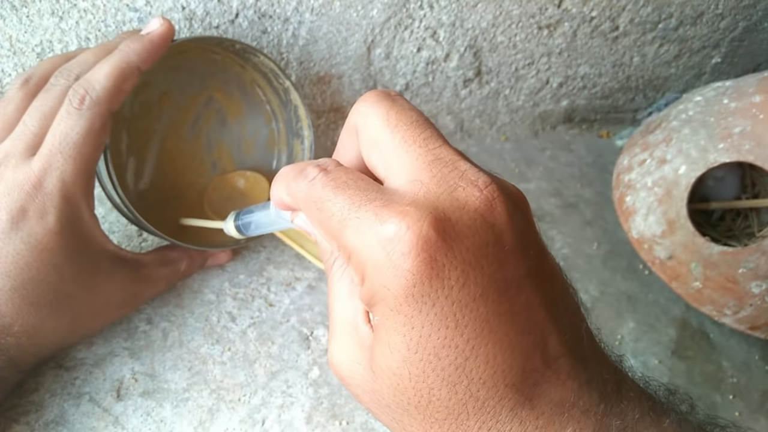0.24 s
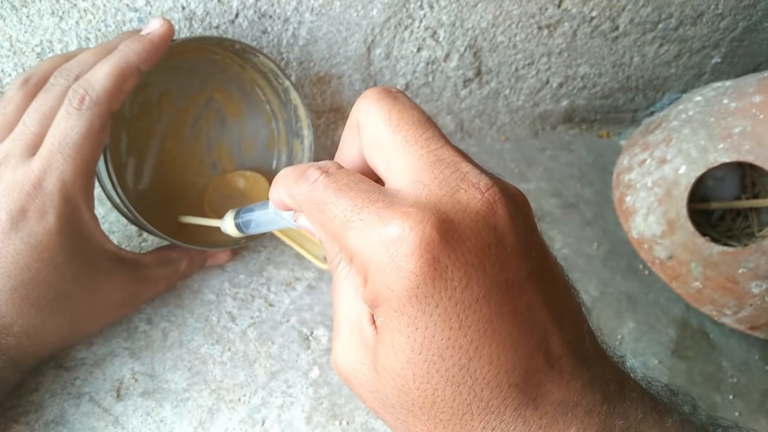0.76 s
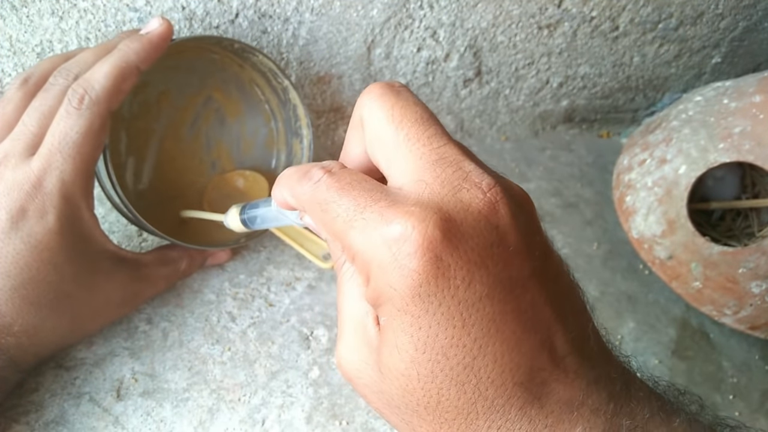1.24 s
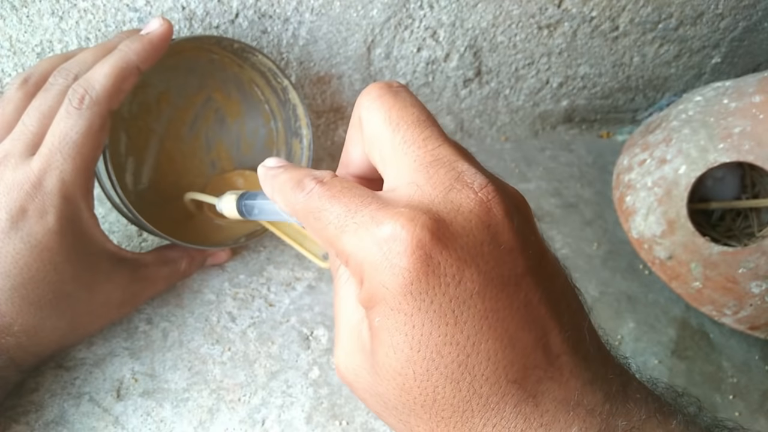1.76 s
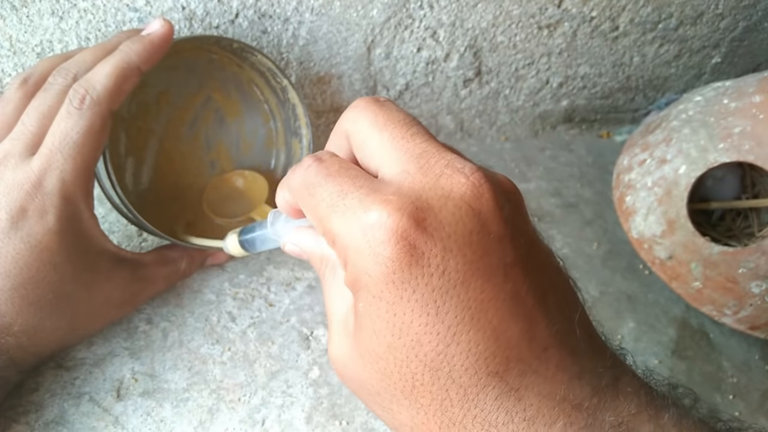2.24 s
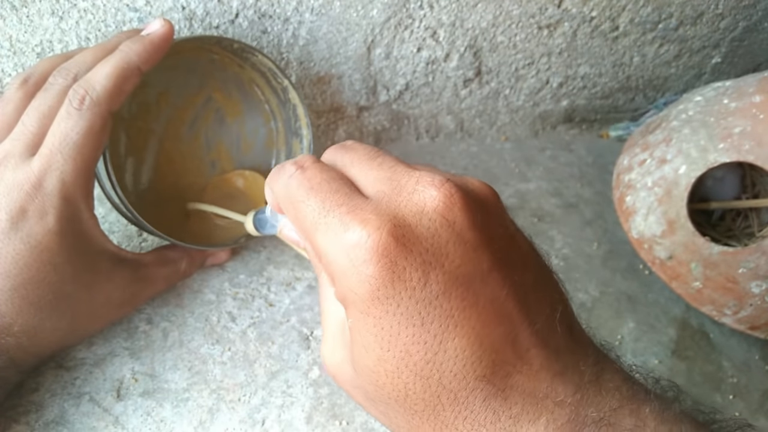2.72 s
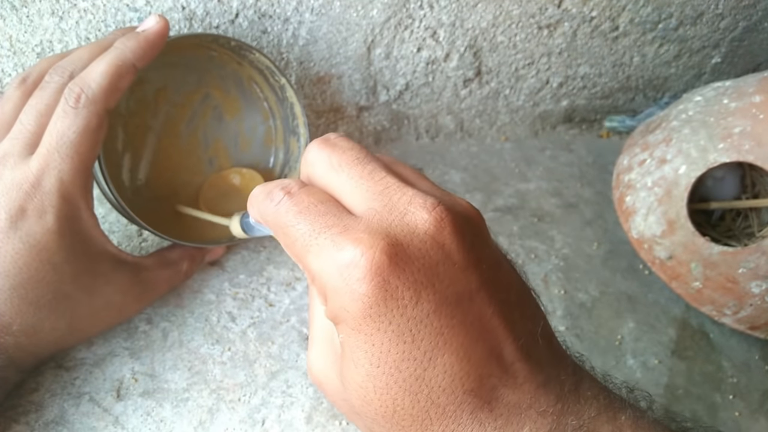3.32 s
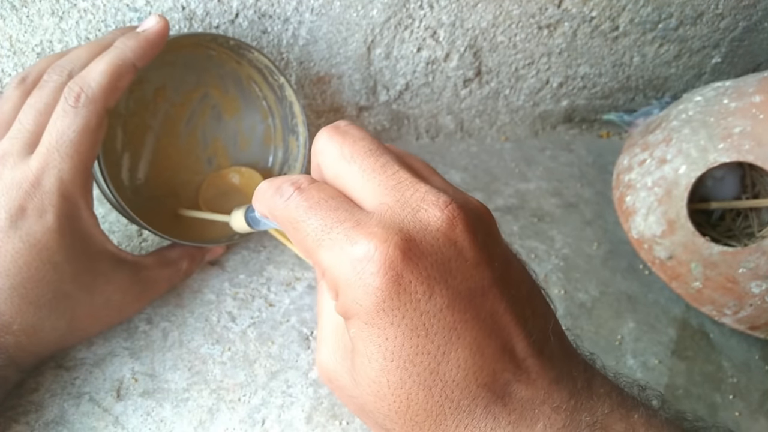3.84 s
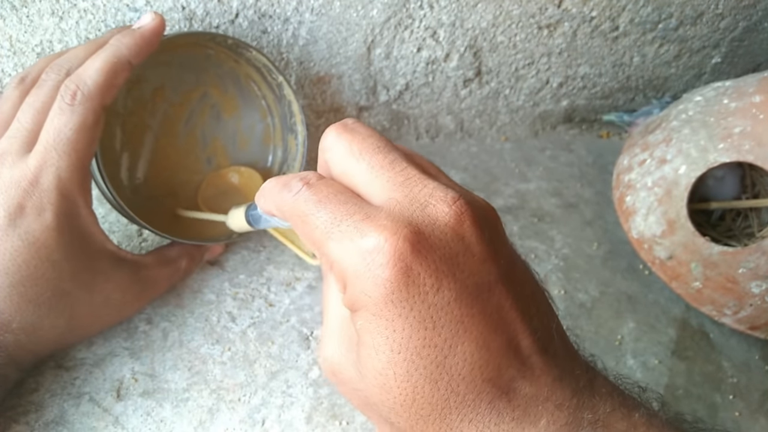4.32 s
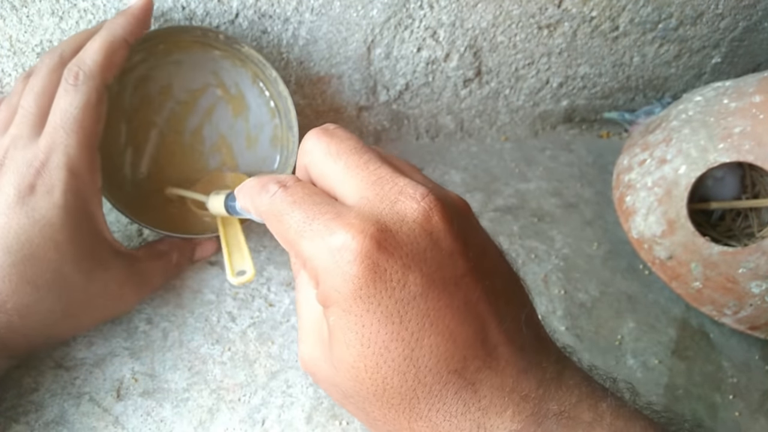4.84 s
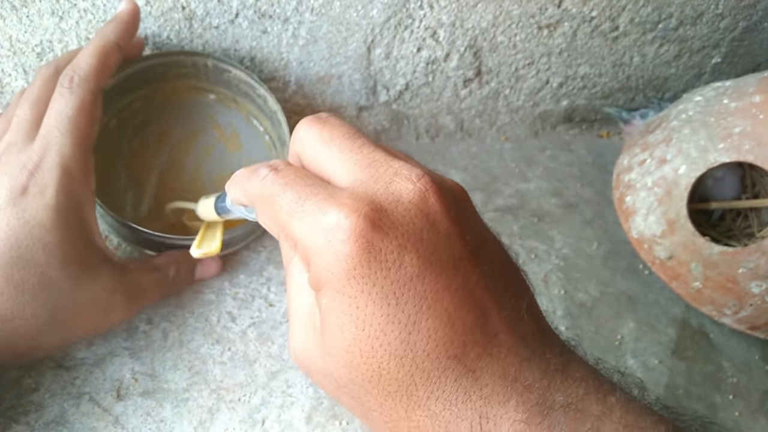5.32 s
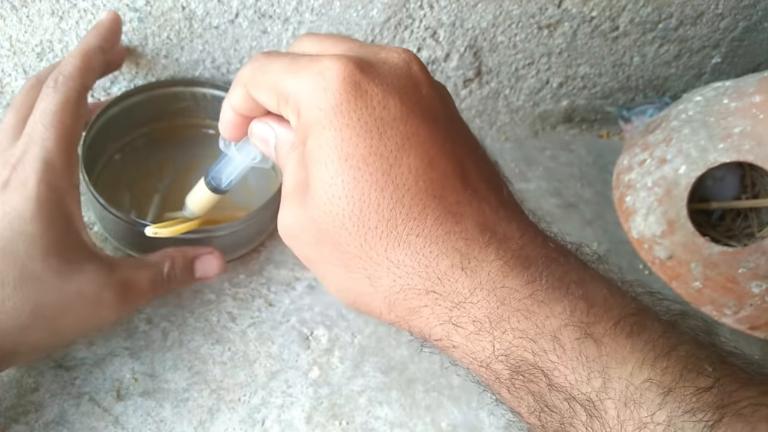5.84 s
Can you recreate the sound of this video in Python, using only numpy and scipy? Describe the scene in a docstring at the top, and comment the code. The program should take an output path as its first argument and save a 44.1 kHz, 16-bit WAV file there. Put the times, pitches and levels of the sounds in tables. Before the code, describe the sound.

In a quiet concrete room, nestlings keep up soft, high, raspy cheeping that comes in waves. A sharp plastic click from a syringe sounds close by, followed by a barely audible low call from a far bird. Later a nearby steel cup is tipped, scraping and rattling with spoon knocks and more syringe clicks. The spoon clinks against the steel, the ring is cut short and the cheeping thins out.

```python
"""Hungry nestlings beg from a clay nest pot in a bare concrete room: thin, hoarse cheeps over bouts
of chatter, with a few pure peeps. Close by, a plastic syringe for their feed clicks, loudest at 1.6 s.
From 2.2 s a far bird holds one faint, low call. From 4.5 s the steel feed cup is tipped: its foot
grates on the floor, a spoon knocks in it and the syringe clicks again. The spoon clinks on bare steel
at 5.5 s, fingers choke the ring, and the begging thins out."""
import sys
import numpy as np
from scipy import signal
from scipy.fft import rfft, irfft, next_fast_len
from scipy.io import wavfile
from scipy.ndimage import uniform_filter1d

SR = 44100
rng = np.random.default_rng(int(sys.argv[2]) if len(sys.argv) > 2 else 0)


def store_wav(level_fs):
    """Save 16-bit WAV to argv[1]."""
    pcm = np.round(np.clip(np.atleast_2d(level_fs), -1, 1) * 32767)
    wavfile.write(sys.argv[1], SR, pcm.T.astype(np.int16))


N = 267995
TIME = np.arange(N) / SR
ROOM_T60_S, CUP_MOVES_S = 0.28, 4.5


def from_db(db):
    return 10 ** (np.asarray(db) / 20)


def rms_one(x):
    return x / np.sqrt(np.mean(x ** 2) + 1e-20)


def in_time(rows):
    """The columns of a curve, at every sample."""
    times_s, *columns = np.transpose(rows)
    return [np.interp(TIME, times_s, column) for column in columns]


def at_hz(points, hz):
    """A spectrum read on a log-frequency axis."""
    known_hz, values = np.transpose(points)
    return np.interp(np.log(hz + 1), np.log(known_hz), values)


def decay(start_s, t60_s):
    """Gain of 1 until start_s, then an exponential fall."""
    return from_db(-60 * np.maximum(TIME - start_s, 0) / t60_s)


def swell(start_s, end_s, rise_s, t60_s):
    """Envelope: rise around start_s, hold until end_s, decay."""
    return (1 + np.tanh((TIME - start_s) / rise_s)) / 2 * decay(end_s, t60_s)


def drift(rate_hz, size=N):
    """Smooth random motion of rms 1."""
    pole = np.exp(-2 * np.pi * rate_hz / SR)
    white = rng.standard_normal(size + SR // 10)
    return rms_one(signal.lfilter([1], [1, -2 * pole, pole * pole], white)[-size:])


# left-right likeness: (frequency [Hz], correlation [0-1])
STEREO_LIKENESS = [(2500, 1), (4500, 1), (6500, 0.99), (9000, 0.72), (14000, 0.9)]


def noise(spectrum):
    """Coloured stereo noise of rms 1, wider in the treble."""
    size = next_fast_len(N)
    hz = np.fft.rfftfreq(size, 1 / SR)
    mid, side = rfft(rng.standard_normal((2, size))) * from_db(at_hz(spectrum, hz))
    alike = np.clip(at_hz(STEREO_LIKENESS, hz), 0, 1)
    stereo = np.sqrt(1 + alike) * mid + np.sqrt(1 - alike) * np.array([side, -side])
    return rms_one(irfft(stereo, size)[:, :N])


def patchy_noise(spectrum, depth_db, window):
    """Noise of rms 1 whose narrow bands swell and fade on their own."""
    bands = signal.stft(noise(spectrum), nperseg=window)[2]
    patches = uniform_filter1d(rng.standard_normal(bands.shape[1:]), size=3, axis=0)
    patches = rms_one(uniform_filter1d(patches, size=4, axis=1))
    return rms_one(signal.istft(bands * from_db(depth_db * patches), nperseg=window)[1][:, :N])


def room(x, wet_db):
    """Direct sound plus a dense, dying wash of wall reflections."""
    envelope = decay(0, ROOM_T60_S) * (TIME > .004)
    tail = (noise([(100, 0), (14000, 0.019)]) * envelope)[:, :SR]
    tail /= np.sqrt(np.sum(tail ** 2) / 2)
    return x + from_db(wet_db) * signal.fftconvolve(tail, x[None], axes=1)[:, :N]


# still room: (frequency [Hz], relative density [dB])
AIR_SPECTRUM = [(25, -13), (45, -2.5), (62, 3.5), (90, -8.5), (130, -9.5), (200, -17), (300, -11),
                (420, -16), (1000, -13.5), (2500, -18.5), (5000, -34), (14000, -40)]


def room_air(level_db=-68):
    """The faint, low hush of the room."""
    return from_db(level_db + drift(12)) * patchy_noise(AIR_SPECTRUM, depth_db=5, window=2048)


# the brood's merged voices: (frequency [Hz], relative density [dB])
CHATTER_SPECTRUM = [(600, -32.5), (1000, -31.5), (1400, -11.5), (1900, 1), (2250, -1), (3000, 4.5),
                    (4000, 3), (4700, -5.5), (6000, -19.5)]
WHEEZE_SPECTRUM = [(3500, -19), (5000, -3.5), (7000, -2), (8800, 2.5), (9900, 0.5), (11000, -13),
                   (14000, -25)]
# begging bouts: (start [s], end [s], relative chatter level [dB], relative wheeze level [dB])
BEGGING_BOUTS = [(0, 0.015, -57, -66), (0.131, .37, -60.5, -72), (0.444, 1.216, -52.5, -61.5),
                 (1.271, 1.751, -56, -57.5), (1.88, 2.327, -52, -60.5), (2.448, 2.63, -59.5, -63.5),
                 (2.922, 3.491, -55, -57.5), (3.539, 4.164, -48, -59.5), (4.169, 4.418, -56.5, -57),
                 (4.551, 5.126, -55, -61), (5.121, 5.364, -62, -60), (5.58, 5.736, -54, -63.5),
                 (5.897, 5.983, -70.5, -64)]


def brood(chatter_gain_db=-9, wheeze_gain_db=-4.5, rise_s=.03, surge_db=2.5):
    """Overlapping calls, blurred by the room, merge into a hoarse chatter with a wheeze on top."""
    chatter_level, wheeze_level = np.zeros((2, N))
    for start_s, end_s, chatter_db, wheeze_db in BEGGING_BOUTS:
        chatter_bout = from_db(chatter_db + chatter_gain_db) * swell(start_s, end_s, rise_s, t60_s=.22)
        wheeze_bout = from_db(wheeze_db + wheeze_gain_db) * swell(start_s, end_s, rise_s, t60_s=.15)
        chatter_level = np.maximum(chatter_level, chatter_bout)
        wheeze_level = np.maximum(wheeze_level, wheeze_bout)
    chatter = chatter_level * patchy_noise(CHATTER_SPECTRUM, depth_db=5.5, window=1280)
    wheeze = wheeze_level * patchy_noise(WHEEZE_SPECTRUM, depth_db=5.5, window=768)
    return (chatter + wheeze) * from_db(surge_db * drift(10))


def weak_cheeps(per_s=5, re_chatter_db=-11.5, length_s=.13, low_hz=2595, high_hz=4200):
    """Rows like CLEAR_CHEEPS, scattered over the bouts at random pitches."""
    rows = []
    for start_s, end_s, chatter_db, _ in BEGGING_BOUTS:
        for slot, (offset, height, hoarse) in enumerate(rng.random(size=(8, 3))):
            middle_s = start_s + (slot + offset) / per_s
            hz = low_hz * (high_hz / low_hz) ** height
            if middle_s < end_s:
                rows.append((middle_s, length_s, hz, chatter_db + re_chatter_db, hoarse / 2))
    return rows


# breathy hiss of the cheeps, brightest near 9 kHz: (frequency [Hz], relative density [dB])
CHEEP_HISS_SPECTRUM = [(4500, -44), (6000, -17), (7300, -3), (8300, 5.5), (9200, 7.5), (10000, -5.5),
                       (11000, -10.5), (14000, -16)]
# clearest cheeps: (time [s], length [s], pitch [Hz], relative level [dB], hoarseness [0 pure, 1 full])
CLEAR_CHEEPS = [(0.138, 0.078, 5780, -66, .1), (0.186, .1, 3270, -62.5, 0.78),
                (0.33, .12, 3896, -55.5, 0.64), (.5, 0.075, 4760, -54, 0.75), (.584, .1, 1474, -62.5, 0),
                (0.661, 0.13, 3710, -60.5, 1.2), (0.762, 0.073, 6460, -56, 0.72),
                (0.843, 0.15, 2853, -59, 0.19), (1.103, 0.084, 5710, -61.5, 0),
                (1.13, 0.15, 3680, -60, 0.71), (1.363, 0.15, 3986, -59.5, 0.83),
                (1.447, .1, 5500, -54, 0.27), (1.561, 0.092, 3960, -57, 0.87), (1.83, .12, 3315, -58, 0.01),
                (1.939, 0.13, 3890, -62, 0.85), (2.216, 0.19, 3630, -54.5, .75),
                (2.576, 0.11, 3980, -64, 0.98), (2.875, 0.13, 3115, -58.5, 0.17),
                (2.955, 0.068, 6900, -62.5, 0.57), (3.088, 0.11, 3060, -56.5, 0.49),
                (3.105, .13, 5600, -60, 0.61), (3.177, .11, 3350, -52, 0), (3.313, 0.11, 5090, -57, 0.24),
                (3.617, 0.073, 5340, -58, 0.64), (3.625, .25, 1867, -65, 0),
                (3.649, 0.24, 3080, -52.5, 0.3), (3.793, 0.096, 4080, -48.5, 0.7),
                (3.823, .09, 6380, -57.5, 0.36), (3.869, 0.14, 3120, -48.5, 0.26),
                (3.987, 0.095, 4060, -55, .7), (3.994, .16, 1823, -64.5, 0), (4.071, 0.15, 3087, -55.5, .6),
                (4.11, 0.17, 6270, -56.5, 0.85), (4.556, 0.074, 4700, -62.5, 0.95),
                (4.618, .057, 5380, -52, 0.64), (4.736, 0.072, 4100, -57, 0.16),
                (4.753, 0.068, 6310, -50.5, 0.74), (4.925, 0.091, 4360, -52.5, 0.61),
                (5.012, 0.087, 3950, -58, 0.17), (5.172, .06, 2700, -64.5, .2),
                (5.688, 0.13, 3280, -60, 0.38), (5.941, 0.08, 3890, -61, 0.35)]


def cheeps(flutter_hz=170, rise_octaves=.04, shake_db=3.5, octave_db=-21, tone_db=-1.5, lead_s=.008):
    """Fluttering whistles with a weak octave and breathy hiss; hoarseness raises flutter and hiss."""
    tones, hiss_power = np.zeros((2, N))
    for time_s, length_s, hz, level_db, hoarse in CLEAR_CHEEPS + weak_cheeps():
        from_peak_s = TIME - time_s + lead_s
        on = np.abs(from_peak_s) < length_s
        along = from_peak_s[on] / length_s
        opening = np.exp(-np.abs(2 * along) ** 1.9)
        flutter = np.interp(hoarse, [0, 1], [.035, .08]) * drift(flutter_hz, size=SR)[:len(along)]
        pitch_hz = hz * (2 ** (rise_octaves * along) + flutter)
        phase = 2 * np.pi * np.cumsum(pitch_hz) / SR
        whistle = np.sin(phase) + from_db(octave_db) * np.sin(2 * phase)
        shake = from_db(shake_db * drift(150, size=SR)[:len(along)])
        tones[on] += from_db(level_db + tone_db) * opening * rms_one(whistle * shake)
        hiss_db = np.interp(hoarse, [0, 1], [-24.5, 3.5])
        hiss_power[on] += (from_db(level_db + hiss_db) * opening) ** 2
    # the hiss lingers in the room as the tones do
    pole = from_db(-120 / (ROOM_T60_S * SR))
    hiss_power += signal.lfilter([1 - pole], [1, -pole], hiss_power + 1e-18)
    tones = room(tones, wet_db=0)
    return tones + np.sqrt(hiss_power) * patchy_noise(CHEEP_HISS_SPECTRUM, depth_db=5, window=768)


# syringe barrel: (frequency [Hz], relative density [dB])
BARREL_SPECTRUM = [(300, -41.5), (600, -30), (1000, -17.5), (2000, -14.5), (3000, -27.5), (5500, -9.5),
                   (7500, -7), (8900, 7), (10000, 1), (12000, -5), (14000, -1.5)]
# plastic clicks: (time [s], relative peak [dB], t60 [s])
SYRINGE_CLICKS = [(0.148, -48, 0.14), (1.6403, -13.5, 0.057), (1.692, -38, 0.031), (2.302, -51, .12),
                  (2.447, -59, .15), (4.6253, -34, 0.061), (4.768, -33, 0.031), (5.485, -26, 0.05),
                  (5.512, -33.5, 0.046), (5.548, -35, .05)]


def syringe(gain_db=-5, room_db=-29, room_t60_s=0.38, low_cut_hz=750):
    """Snaps excite the plastic's many short modes; so small a part radiates no bass."""
    power = np.zeros(N)
    for time_s, db, t60_s in SYRINGE_CLICKS:
        direct = from_db(db) * decay(time_s, t60_s)
        tail = from_db(db + room_db) * decay(time_s, room_t60_s)
        power += (TIME >= time_s) * (direct ** 2 + tail ** 2)
    snaps = from_db(gain_db) * np.sqrt(power) * noise(BARREL_SPECTRUM)
    return signal.sosfilt(signal.butter(4, low_cut_hz, "high", fs=SR, output="sos"), snaps)


# nestlings' short peeps: (start [s], pitch [Hz], relative level [dB])
PURE_PEEPS = [(.840, 3966, -43.5), (1.046, 3990, -47.5), (2.051, 3495, -42), (2.098, 4010, -39),
              (3.604, 5430, -48)]


def peeps(fall_20db_s=0.045, rise_s=0.0056, waver=0.019, octave_db=-16):
    """Clean whistles with a faint octave that start at once and die away."""
    whistles = np.zeros(N)
    age_s = TIME[:SR // 4]
    for start_s, hz, db in PURE_PEEPS:
        pitch_hz = hz * (1 + waver * drift(118, size=len(age_s)))
        phase = 2 * np.pi * np.cumsum(pitch_hz) / SR
        tone = np.sin(phase) + from_db(octave_db) * np.sin(2 * phase)
        envelope = from_db(db - 20 * age_s / fall_20db_s) * (1 - np.exp(-age_s / rise_s))
        whistles[round(start_s * SR):][:len(age_s)] += envelope * tone
    return np.sqrt(2) * room(whistles, wet_db=-0.5)


# notes of the far call: (start [s], end [s], pitch [Hz], relative level [dB])
FAR_CALL = [(2.242, 2.382, 767, -60.5), (2.49, 2.588, 776, -65), (2.73, 2.795, 755, -69.5),
            (2.818, 3.055, 709, -65.5)]


def far_bird(waver=0.0208, gain_db=-6, rise_s=0.0072, t60_s=0.17):
    """Four held, slightly wavering notes, the last one lowest."""
    phase_per_hz = 2 * np.pi * np.cumsum(1 + waver * drift(53)) / SR
    notes = sum(np.sin(hz * phase_per_hz) * from_db(db + gain_db) * swell(start_s, end_s, rise_s, t60_s)
                for start_s, end_s, hz, db in FAR_CALL)
    return room(np.sqrt(2) * notes, wet_db=4.5)


# cup on the floor: (frequency [Hz], relative density [dB])
RUMBLE_SPECTRUM = [(30, -16.5), (70, 4), (125, 2.5), (200, -8.5), (400, -26.5), (800, -32.5)]
# its rumble: (time [s], level [dB])
RUMBLE_CURVE = [(4.5, -94), (4.574, -75), (4.732, -64.5), (4.806, -81.5), (5.578, -47.5), (5.758, -76.5),
                (5.834, -64), (5.966, -70.5), (6.077, -55.5)]


def handling():
    """Low rumble as the hand shifts the cup on the floor."""
    level = (TIME > CUP_MOVES_S) * from_db(in_time(RUMBLE_CURVE)[0])
    return level * patchy_noise(RUMBLE_SPECTRUM, depth_db=6, window=4096)


def foot_grating(gain_db=-26, knock_cap_db=-14.5, lead_s=0.0074, rise_s=.006, t60_s=0.32):
    """Envelope of the cup's foot skidding and settling with each knock; hard skids are capped."""
    skids = [from_db(db) * swell(time_s - lead_s, time_s, rise_s, t60_s)
             for time_s, db, _, _ in CUP_KNOCKS]
    return from_db(gain_db) * np.minimum(np.max(skids, axis=0), from_db(knock_cap_db))


# foot scraping the floor: (frequency [Hz], relative density [dB])
GRIT_SPECTRUM = [(300, -14.5), (450, -9.5), (750, 7), (1100, -3), (1450, -6.5), (2000, -11), (2500, -19.5),
                 (3500, -32), (6000, -39)]


def grit(grating, flicker_db=3.8):
    """Rough scrape of the skidding foot."""
    return grating * from_db(flicker_db * drift(120)) * noise(GRIT_SPECTRUM)


# knocks in the cup: (time [s], relative level [dB], contact cutoff [Hz], gain for base modes [dB])
CUP_KNOCKS = [(4.5754, -23.5, 1200, -2), (4.623, -43, 2500, 3), (4.667, -36.5, 1020, -3),
              (5.038, -39.5, 1190, -4), (5.0594, -28.5, 1255, -5), (5.203, -32.5, 1240, -0.5),
              (5.239, -28.5, 1250, 1.5), (5.2933, -25, 1230, 1.5), (5.317, -34, 1150, 6.5),
              (5.349, -27.5, 1290, -4), (5.3975, -24, 1250, -1.5), (5.435, -26, 1350, -4),
              (5.461, -17.5, 1400, -7.5), (5.4841, -13.5, 9000, -16), (5.4867, -7.7, 1598, -17.5),
              (5.546, -35, 9000, -11.5), (5.555, -26, 2000, -7), (5.614, -45, 1710, -8),
              (6.043, -54.5, 2410, -12.5)]
# fingers closing on the wall: (time [s], ring gain [dB])
FINGER_GRIP = [(5.52, 3), (5.54, -14)]


def cup_mode(hz, mode_db, t60_s, grating, contact_cycles=7.9, rub_db=-18.5, rub_hz=1500, base_hz=1000):
    """One mode (hz per sample), knocked and rubbed; soft, feed-coated contacts reach only low modes."""
    knock_s, knock_db, cutoff_hz, base_db = np.transpose(CUP_KNOCKS)
    first = round(CUP_MOVES_S * SR)
    hz = hz[first:]
    hits = np.round(knock_s * SR).astype(int) - first
    grip = from_db(in_time(FINGER_GRIP)[0][first:])
    rotation = np.exp(2j * np.pi * np.cumsum(hz) / SR) * grip
    # grating: a stream of tiny random pushes
    pushes = rng.standard_normal(len(hz)) * grating[first:] * from_db(rub_db)
    force = pushes / np.sqrt(1 + (hz / rub_hz) ** 4)
    # rocking on the floor rings the base; a blow high on the wall hardly does
    strength = from_db(knock_db + base_db * (hz[hits] < base_hz))
    force[hits] += strength / np.sqrt(1 + (hz[hits] / cutoff_hz) ** 36)
    swing = signal.lfilter([1], [1, -from_db(-60 / (t60_s * SR))], force / rotation)
    # a contact lasts a few cycles, so the swing builds without a click
    contact = np.hanning(int(contact_cycles * SR / hz[0]) + 3)
    swing = signal.oaconvolve(swing, contact / contact.sum())[:len(hz)]
    return np.pad(from_db(mode_db) * np.imag(swing * rotation), (first, 0))


# the rim's two strongest modes: (time [s], lower [Hz], upper [Hz])
RIM_GLIDE = [(4.6, 1104, 1163), (5.08, 1094, 1163), (5.25, 1092, 1148), (5.42, 1104, 1150),
             (5.49, 1069, 1109), (5.6, 1062, 1088)]
# their ring, lower then upper: (gain [dB], t60 [s])
RIM_DECAYS = [(0.66, 0.15), (-1.5, 0.11)]
# the cup's other modes: (frequency [Hz], gain [dB], t60 [s])
WALL_MODES = [(451.5, -24.5, 0.077), (624, -18, .06), (687, -26.5, 0.047), (803.5, -7, 0.042),
              (823, -5.5, 0.1), (953, -23.5, 0.05), (1454, -10, 0.052), (1440, -9.5, 0.08),
              (1527, -15.5, 0.22), (1650, -26, 0.1), (1785, -28, 0.053), (1940, -21, 0.098),
              (2062, -23, 0.25), (2356, -17, 0.14), (2420, -24.5, 0.046), (2860, -28, .06),
              (3138, -26, 0.12), (3505, -38.5, 0.13), (4360, -39, 0.101), (5548, -24.5, .32),
              (6720, -36, 0.086), (7700, -20, 0.089), (9100, -28.5, 0.12)]


def cup(grating, gain_db=1.5):
    """Steel rings; the beating rim modes sink and close up as the cup tips and feed runs up its wall."""
    rim = sum(cup_mode(hz, db, t60_s, grating)
              for hz, (db, t60_s) in zip(in_time(RIM_GLIDE), RIM_DECAYS))
    wall = sum(cup_mode(np.full(N, float(hz)), db, t60_s, grating) for hz, db, t60_s in WALL_MODES)
    return from_db(gain_db) * room(rim + wall, wet_db=-19)


# weak, close modes that only bare contacts reach: (frequency [Hz], relative density [dB])
CLINK_SPECTRUM = [(700, -26.5), (1400, 4), (2000, -0.5), (2500, -7.5), (3300, -13.5), (4500, -17.5),
                  (5600, -10), (6500, -18), (8000, -7.5), (11000, -21), (14000, -32.5)]
# spoon on bare steel: (time [s], level [dB])
SPOON_STRIKES = [(5.4845, -25.5), (5.55, -43)]


def spoon_clinks(t60_s=0.2):
    """Countless faint modes of the thin wall die together as a rough shimmer."""
    power = sum((TIME >= time_s) * (from_db(db) * decay(time_s, t60_s)) ** 2
                for time_s, db in SPOON_STRIKES)
    return np.sqrt(power) * patchy_noise(CLINK_SPECTRUM, depth_db=6, window=1024)


def scene():
    """Birds, syringe and cup over the quiet of the room."""
    grating = foot_grating()
    return (room_air() + brood() + cheeps() + syringe() + peeps() + far_bird()
            + handling() + grit(grating) + cup(grating) + spoon_clinks())


def record(dry, cutoff_hz=14300):
    """Steep low-pass."""
    return signal.sosfilt(signal.ellip(10, .2, 70, cutoff_hz, fs=SR, output="sos"), dry)


dry = scene()
out = record(dry)
store_wav(out)
```